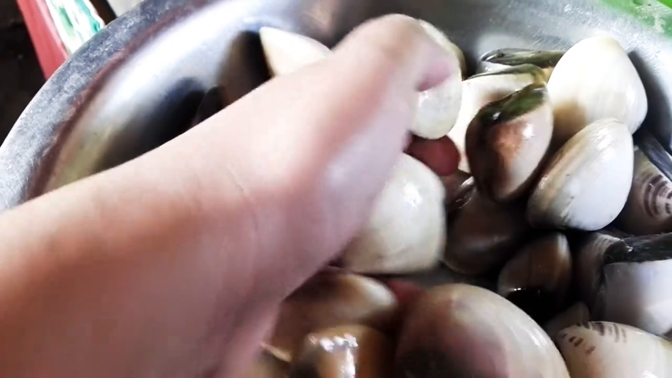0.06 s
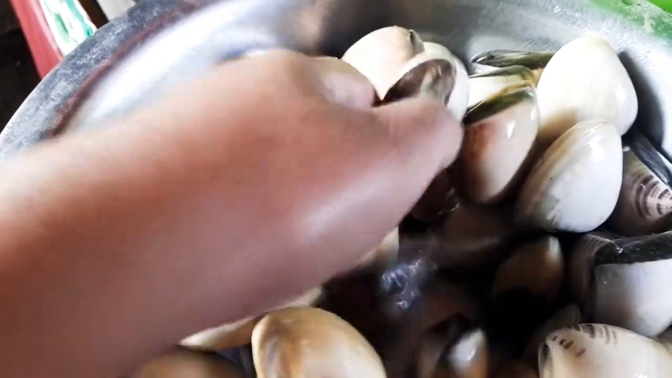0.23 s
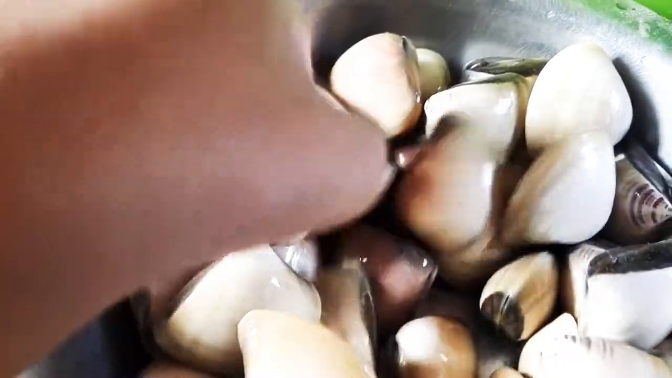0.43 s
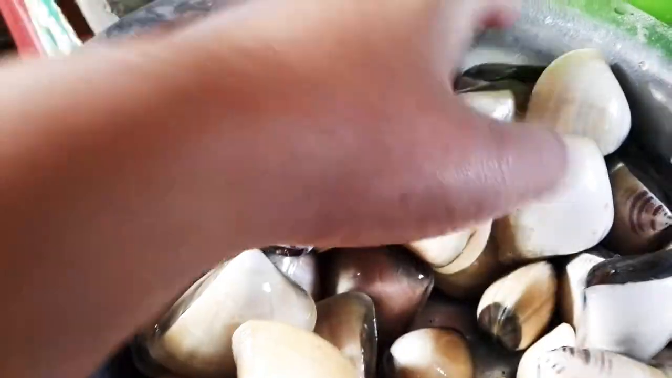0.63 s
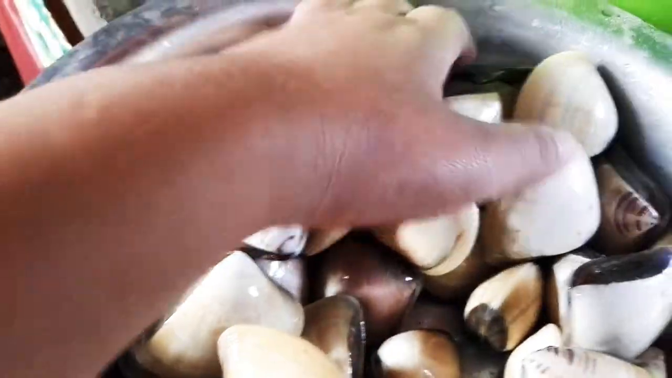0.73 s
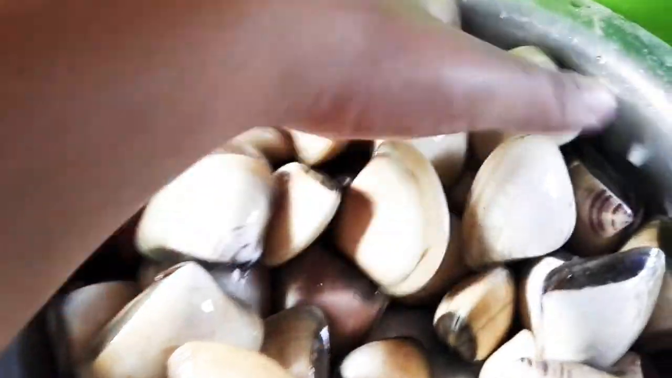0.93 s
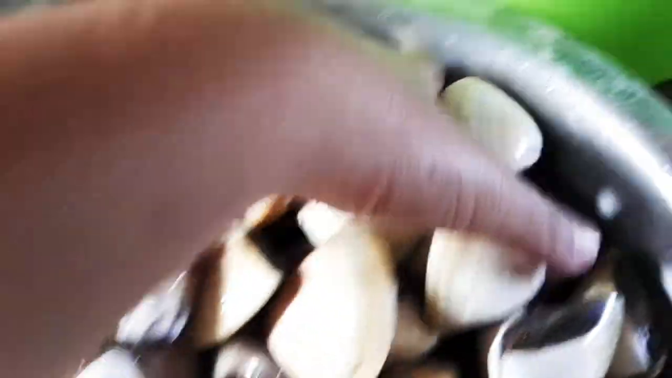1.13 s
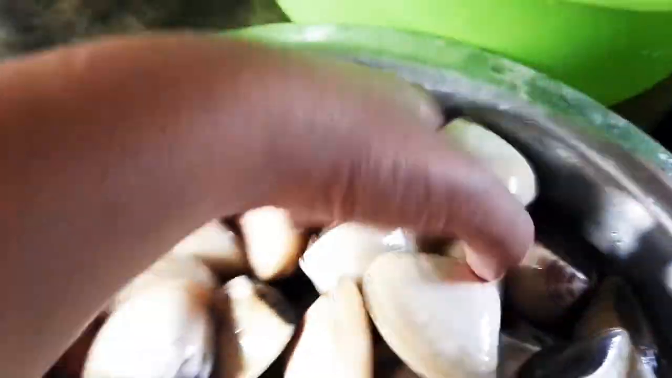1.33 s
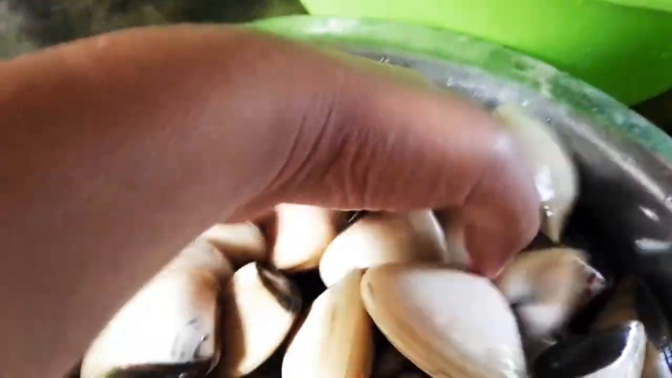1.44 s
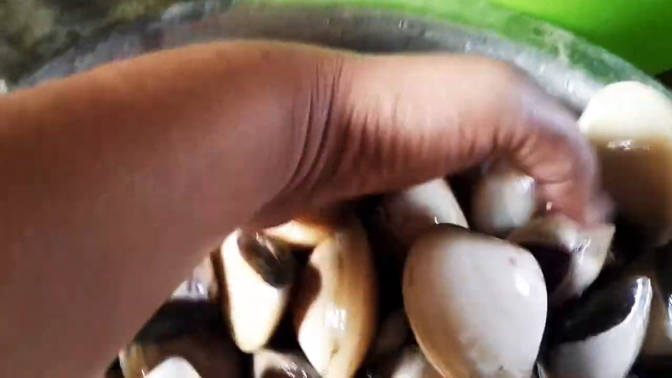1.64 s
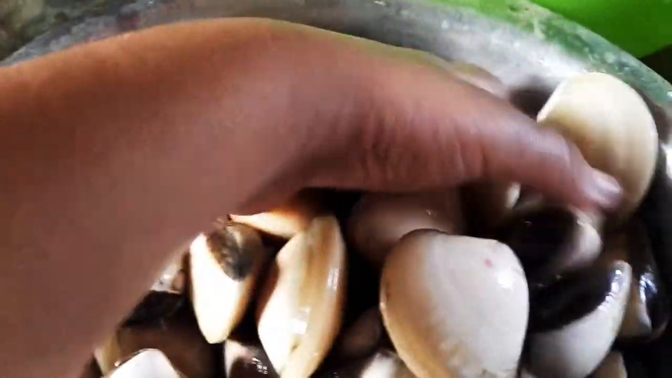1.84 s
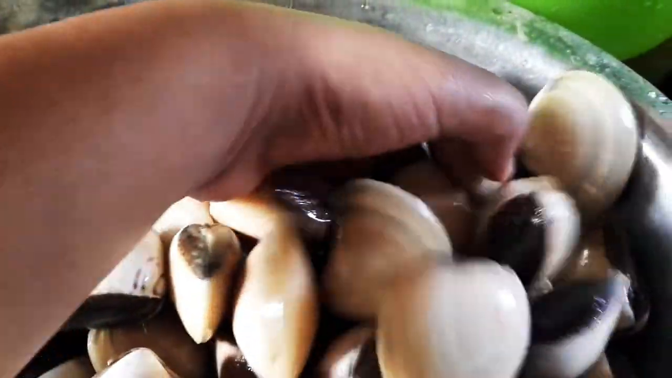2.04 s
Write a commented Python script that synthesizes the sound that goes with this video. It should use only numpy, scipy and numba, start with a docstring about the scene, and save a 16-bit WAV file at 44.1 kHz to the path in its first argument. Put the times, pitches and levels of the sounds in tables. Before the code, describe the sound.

A hand stirs heavy shells in a metal basin, first with a dense, slightly clipped crash of knocks, then after a pause in lighter scattered clacks and scrapes, close stereo phone pickup, short dull room tail.

```python
"""Over a distant engine and a low rumble, two faint knocks come first from a metal bowl of clam shells.
A hand then stirs hard, just below a phone with two microphone ports; the shells knock and grind loudly.
A lull follows, then looser stirring in bursts to the end, while the engine climbs in pitch and sinks again.
Each shell contact rings short decaying tones and pushes the damped bowl, whose modes ring in turn.
A small room answers with a noise tail, dull thuds are low decaying tones, the engine is summed sines."""
import sys
import numpy as np
from scipy import signal
from scipy.fft import rfft, irfft
from scipy.io import wavfile
from numba import njit

SR = 44100
rng = np.random.default_rng(int(sys.argv[2]) if len(sys.argv) > 2 else 0)


def amplitude_ratio(level_db):
    """Convert a level in decibels to the matching linear amplitude (field) ratio."""
    exponent = np.asarray(level_db, float) / 20
    return 10 ** exponent


def bounce(signal):
    """Save signal as a 16-bit WAV file at the path given by the first command-line argument."""
    frames = np.transpose(np.atleast_2d(signal))
    limited = np.clip(frames, -1, 1)
    pcm = np.round(limited * 32767).astype(np.int16)
    wavfile.write(sys.argv[1], SR, pcm)


N = 92610  # 2.1 s

# distant engine: start_s, firing_hz, first_multiple_db, second_multiple_db, third_multiple_db
ENGINE = [(0, 29.5, -73, -56, -52), (.2, 29.7, -60, -52, -59), (.5, 32, -63.5, -66.5, -74),
          (.85, 36.2, -59, -68, -68), (1.0, 38.7, -68, -66, -53), (1.2, 40.1, -64, -63, -50),
          (1.42, 42.36, -60, -60, -51), (1.65, 44.3, -68, -51.5, -50.5), (1.8, 41.5, -54, -74, -71),
          (2.1, 35.4, -63, -71, -80)]
FOURTH_DB, FOURTH_FADE_S = -48.5, 0.16  # fourth multiple, heard at first only; 10 dB down at FOURTH_FADE_S
# bass rumble: start_s, level_db
RUMBLE_LEVEL = [(0, -53), (.6, -63.5), (1.6, -51), (2.1, -66.5)]
# colour of the steady noise floor: pitch_hz, relative_level_db
FLOOR_COLOUR = [(25, -2.5), (129, 2), (498, -16), (900, -50), (2310, -30), (14000, -58.5)]
FLOOR_DB = -69.5

# dull thuds through the table: start_s, level_db, pitch_hz
TABLE_THUDS = [(0.242, -15.5, 171), (0.258, -16.5, 73.4), (0.401, -24, 126), (1.81, -36, 49.7)]
THUD_T60_S = 0.047

# modes of the bowl under the heap: pitch_hz, relative_level_db, t60_s
BOWL_MODES = [(326, -2, 0.032), (367, -2, 0.039), (454.4, 2, 0.062), (513, -4.5, 0.046),
              (740, -24.5, 0.016), (790, 5, 0.032), (1430, -20, 0.097), (2000, -6, .045), (2560, -12, .05)]
BOWL_PAN_DB = -3.5  # left port over right

# knocks: start_s, strength_db, main_tone_hz, bowl_drive_db, treble_db; the mix below is added
SHELL_KNOCKS = [(0.073, -37.5, 2200, -14, 5), (0.115, -28.5, 2380, 3, -21), (.219, -7.5, 758, -3, -24),
                (.228, -15, 597, -10, -23), (.237, -11.5, 5080, -15, 9.5), (.255, -1, 2510, -22, -11),
                (.263, 3.5, 777, -30, -7), (0.268, 6.5, 1940, -18, -12), (0.273, 6.5, 2044, -26, -15),
                (0.296, -6.5, 741, 11.5, -7.5), (.308, -4.5, 838, -3, -5), (0.379, -6, 2140, -12, -7.5),
                (.408, -12.5, 682, -6, -21.5), (0.418, -5.5, 2060, -17, -10),
                (0.449, -4.5, 1340, -23, -4.5), (.468, -9.5, 2900, 1, 0.5), (0.478, -14, 3300, -25, -9.5),
                (0.503, -14, 2410, -25, 1), (.513, -13.5, 3940, -24, -9), (0.73, -34, 790, -24, 5.5),
                (.812, -13.5, 950, -13.5, -31), (.826, -14.5, 2010, -42, -18), (0.834, -19, 1220, -40, -4),
                (0.91, -19.5, 2850, -14, 6), (0.943, -13, 2720, -23, -20), (.947, -10.5, 980, -38, -31),
                (.957, -13, 770, -2, -1.5), (1.127, -29, 970, -11, 13.5), (1.237, -27.5, 2940, -12, -1),
                (1.268, -19.5, 2000, -32, -3), (1.307, -11, 4870, -16, -4), (1.36, -18.5, 740, -21, 1),
                (1.414, -17.5, 2810, -5, -22), (1.442, -17.5, 2600, 2, -23), (1.456, -18, 4700, 11.5, 8.5),
                (1.491, -2.5, 3250, -26, -9), (1.495, -8, 778, -13, 6), (1.639, -5, 4860, -6, -4),
                (1.681, -14.5, 2290, 4, -5), (1.703, -18, 907, -22, -25), (1.722, -11, 752, -24, -12),
                (1.811, -18.5, 790, 9, -19), (1.811, -10, 1740, -17, -28), (1.873, -15.5, 2720, -13, -24),
                (1.882, -18.5, 2280, -14, -30), (1.894, -19.5, 4120, -29, 10), (1.904, -23, 2620, -39, 4),
                (1.976, -24, 2640, -36, -20), (2.008, -23, 1120, 1, -7), (2.032, -25.5, 368.5, 10.5, -10),
                (2.094, -12, 2710, -25, -30)]
# mix of a knock: main_tone_db, shell_db, bowl_db, treble_db
KNOCK_MIX = (-2, -12, -2, -5)
KNOCK_CONTACTS, KNOCK_SPREAD_S = 9, 0.005  # contacts in a knock, mean delay of those after the first
FOLLOW_DB, FOLLOW_FALL_DB_PER_S = -9, -500

# stirring: start_s, grind_strength_db, bowl_drive_db, treble_db; the mix below is added
STIRRING = [(0, -54, 15.5, -8), (.11, -69.5, -17, -4), (.12, -36, 1.5, -13), (.2, -35, 15.5, -1),
            (.225, -16, 12.5, -19), (.25, -30, 19, -7), (.272, -1, 4.5, -7), (.29, -20.5, 1, -8),
            (.31, -15, 0.5, -9), (.36, -29, 13.5, -11.5), (.425, -14, 3.5, -12.5), (.444, -30, 2, -11.5),
            (.465, -18.5, 0, -13.5), (.497, -36, 17.5, -15), (.54, -45, 15.5, -11.5), (.6, -68.5, -14, -6),
            (.71, -67.5, -3, -14), (.735, -53.5, -20.5, 1.5), (.805, -58, -3, -14), (.815, -31.5, -14, -13),
            (.89, -43.5, -27, -6.5), (.95, -23.5, 2, -7), (1.04, -33.5, 6.5, -9), (1.17, -31, 4, -9.5),
            (1.23, -46, 7.5, -8.5), (1.3, -47, 17, -4.5), (1.315, -32, 8.5, -8.5), (1.43, -35, 6.5, -12),
            (1.5, -21.5, 12.5, -12), (1.56, -26, 6, -5.5), (1.62, -29, 9.5, -2), (1.67, -38.5, 5, -17),
            (1.71, -36, 9, 0.5), (1.85, -38, 7, -10), (1.9, -38.5, 9, -2.5), (2.0, -54.5, -16, -2),
            (2.015, -27.5, -5, -8.5), (2.08, -43.5, 15, -7), (2.1, -21.5, -17, -5.5)]
# mix of the grind: main_tone_db, shell_db, bowl_db, treble_db
GRIND_MIX = (-14.5, -9, -13, 0.5)
GRIND_PER_S = 2500
GRIND_SCATTER_DB, GRIND_CAP_DB = 3, 13  # mean and largest rise of a contact above the stirring strength

SHELL_LO_HZ, SHELL_HI_HZ, TREBLE_HI_HZ = 675, 4170, 14290
TREBLE_TILT_DB = -6  # fall across the treble
MAIN_T60_S, SHELL_T60_S, TREBLE_T60_S = 0.024, 0.016, 0.02  # at 1 kHz, shorter for higher tones
RISE_S = 0.0003
LAG_S, LAG_SPREAD_S = 0.0003, 0.00016  # the left port hears later
PAN_DB, HIGH_PAN_DB, PAN_SPREAD_DB = -2.5, 2.0, 3.5  # left over right: up to 6 kHz, above it, scatter

ROOM_DB, ROOM_T60_S, ROOM_HZ = -14, 0.11, 7000
LOW_CUT_HZ, TOP_HZ, CLIP = 265, 14400, 1.0


@njit
def ring(start, hz, t60, size, rise, length):
    """Decaying tones with a soft attack, each started at a fractional sample."""
    out = np.zeros(length)
    rise_step = np.exp(-1 / (rise * SR))
    for k in range(len(hz)):
        step = np.exp(2j * np.pi * hz[k] / SR - np.log(1000) / (t60[k] * SR))
        first = int(start[k]) + 1
        tone = size[k] * step ** (first - start[k])
        softness = rise_step ** (first - start[k])
        for j in range(max(first, 0), min(length, first + int(t60[k] * SR))):
            out[j] += tone.imag * (1 - softness)
            tone *= step
            softness *= rise_step
    return out


def curve(table, col):
    """A table column joined by straight lines in time."""
    table = np.array(table)
    return lambda t: np.interp(t, table[:, 0], table[:, col])


def shaped(points):
    """Noise of rms 1 coloured by (Hz, dB) points."""
    hz, db = np.array(points).T
    f = np.maximum(np.arange(N // 2 + 1) * SR / N, 1)
    gain = amplitude_ratio(np.interp(np.log(f), np.log(hz), db))
    x = irfft(rfft(rng.standard_normal(N)) * gain, N)
    return x / np.std(x)


def engine(t):
    """Distant engine: sines at the first four multiples of a wavering firing rate."""
    waver = shaped([(1, 0), (8, 0), (16, -40)])
    rate_hz = curve(ENGINE, 1)(t) * (1 + 0.0078 * waver)
    phase = 2 * np.pi * np.cumsum(rate_hz) / SR
    levels = [curve(ENGINE, col)(t) for col in (2, 3, 4)]
    levels.append(FOURTH_DB - 10 * (t / FOURTH_FADE_S) ** 2)
    return sum(amplitude_ratio(db) * np.sqrt(2) * np.sin((k + 1) * phase + k) for k, db in enumerate(levels))


def background():
    """Engine a little louder on the right; rumble and noise floor, each mostly common to both ports."""
    t = np.arange(N) / SR
    wide = 0.12 * np.array([[1], [-1]])
    motor = engine(t) * (1 - wide)
    colour = [(25, -17), (130, -9.5), (200, -17.5), (400, -86)]
    rumble = amplitude_ratio(curve(RUMBLE_LEVEL, 1)(t)) * (shaped(colour) + wide * shaped(colour))
    floor = amplitude_ratio(FLOOR_DB) * (shaped(FLOOR_COLOUR) + wide * shaped(FLOOR_COLOUR))
    return motor + rumble + floor


def room(x):
    """Small room: a short dull tail of decaying noise, different at each port."""
    t = np.arange(int(0.4 * SR)) / SR
    tail = rng.standard_normal((2, len(t))) * amplitude_ratio(-60 * t / ROOM_T60_S)
    tail *= t > 0.002  # silent before the first reflection
    tail = signal.lfilter(*signal.butter(1, ROOM_HZ, fs=SR), tail)
    tail = tail / np.sqrt(np.sum(tail ** 2, axis=1, keepdims=True))
    return amplitude_ratio(ROOM_DB) * signal.fftconvolve(x, tail, axes=1)[:, :N]


def thuds():
    """Short low decaying tones through the table, alike at both ports."""
    t, db, hz = np.array(TABLE_THUDS, float).T
    return ring(t * SR, hz, np.full(len(t), THUD_T60_S), amplitude_ratio(db), 0.0038, N)


def bowl(push):
    """The pushes ring the bowl's modes; each port meets them in its own proportions."""
    hz, db, t60 = np.array(BOWL_MODES).T
    size = amplitude_ratio(db + rng.standard_normal(len(hz))) / 10
    body = ring(0 * hz, hz, t60, size, 0.0004, 8192)
    return signal.fftconvolve(push, body)[:N]


def contacts(t, db, hz, bowl_db, treble_db, mix_db, count):
    """Shell on shell: a main tone, chance tones over middle and treble, and a push on the bowl."""
    size = 1 + 2 * count
    u = rng.random((len(t), size))
    tone_pan, tone_shift = rng.standard_normal((2, len(t), size))
    push_sign, contact_pan, contact_lag = rng.standard_normal((3, len(t)))

    # one chance tone in each of count slots, first over the middle, then over the treble
    place = (np.arange(2 * count) % count + u[:, 1:]) / count
    mid_place, top_place = place[:, :count], place[:, count:]
    mid = SHELL_LO_HZ * (SHELL_HI_HZ / SHELL_LO_HZ) ** mid_place ** 0.617
    top = SHELL_HI_HZ + (TREBLE_HI_HZ - SHELL_HI_HZ) * top_place
    tones = np.column_stack([hz, mid, top])
    t60 = np.repeat([MAIN_T60_S, SHELL_T60_S, TREBLE_T60_S], [1, count, count])
    t60 = t60 * (1000 / tones) ** 0.6

    main_db, shell_db, push_db, top_db = mix_db
    treble = (db + treble_db + top_db)[:, None] + TREBLE_TILT_DB * top_place
    level = np.column_stack([db + main_db] + [db + shell_db] * count + [treble])
    level[:, 1:] += 3 * rng.standard_normal((len(t), 2 * count))  # each tone is struck more or less

    out = []
    for side in (1, -1):  # left port, right port
        late = t + side * (LAG_S + LAG_SPREAD_S * contact_lag) / 2
        tilt_db = np.where(tones > 6000, HIGH_PAN_DB, PAN_DB)
        pan = side * (tilt_db + PAN_SPREAD_DB * contact_pan[:, None] + 2 * tone_pan) / 2
        start = late[:, None] + side * 0.00004 * tone_shift + 0.0008 * u
        start[:, 0] = t + side * LAG_S / 2  # the main tone keeps the plain lag
        shell = ring(start.ravel() * SR, tones.ravel(), t60.ravel(), amplitude_ratio(level + pan).ravel(), RISE_S, N)
        push_size = np.sign(push_sign) * amplitude_ratio(db + bowl_db + push_db + side * BOWL_PAN_DB / 2)
        push = ring(late * SR, np.full(len(t), 900.0), np.full(len(t), 0.00068), push_size, 0.0001, N)
        out.append(shell + bowl(push))
    return np.array(out)


def grind():
    """Dense small contacts at chance moments; the stirring sets their strength."""
    u = rng.random((int(GRIND_PER_S * N / SR), 4))
    t = u[:, 0] * N / SR
    rise_db = np.minimum(-GRIND_SCATTER_DB * np.log(u[:, 1]), GRIND_CAP_DB)
    db = curve(STIRRING, 1)(t) + rise_db
    hz = np.where(u[:, 3] < 0.5, 700 + 160 * u[:, 2], 1700 + 1400 * u[:, 2])
    bowl_db, treble_db = curve(STIRRING, 2)(t), curve(STIRRING, 3)(t)
    return contacts(t, db, hz, bowl_db, treble_db, GRIND_MIX, count=3)


def knocks():
    """Each knock is a first contact and a fading rattle of weaker ones just after."""
    rows = np.repeat(np.array(SHELL_KNOCKS, float), KNOCK_CONTACTS, axis=0)
    start, strength_db, main_hz, bowl_db, treble_db = rows.T
    later = np.arange(len(rows)) % KNOCK_CONTACTS > 0
    u = rng.random((len(rows), 3))
    delay = -KNOCK_SPREAD_S * np.log(u[:, 0]) * later
    db = strength_db + later * (FOLLOW_DB - 6 * u[:, 1]) + FOLLOW_FALL_DB_PER_S * delay
    hz = main_hz * (1 + later * 0.097 * (u[:, 2] - 0.5))
    return contacts(start + delay, db, hz, bowl_db, treble_db, KNOCK_MIX, count=7)


def scene():
    """Shells and bowl close to the ports, without deep bass, with their room, thuds and background."""
    low_cut = signal.butter(6, LOW_CUT_HZ, "high", fs=SR, output="sos")
    shells = signal.sosfilt(low_cut, knocks() + grind())
    return shells + room(shells) + thuds() + background()


def low_pass(x):
    """Removes everything above the highest recorded frequency."""
    return signal.sosfilt(signal.butter(12, 14940, fs=SR, output="sos"), x)


def record(dry):
    """The phone cuts the top of the spectrum and clips the loudest peaks."""
    top_cut = signal.ellip(8, 0.2, 60, TOP_HZ, fs=SR, output="sos")
    wet = signal.sosfilt(top_cut, dry)
    return low_pass(np.clip(wet, -CLIP, CLIP))


dry = scene()
out = record(dry)
bounce(out)
```